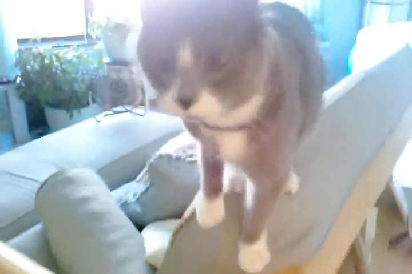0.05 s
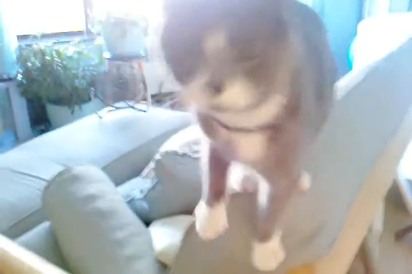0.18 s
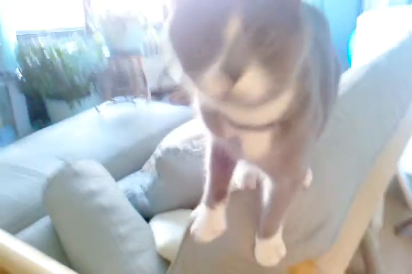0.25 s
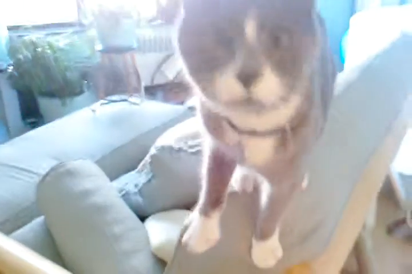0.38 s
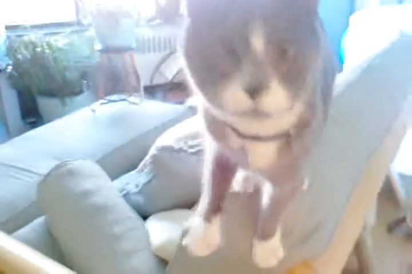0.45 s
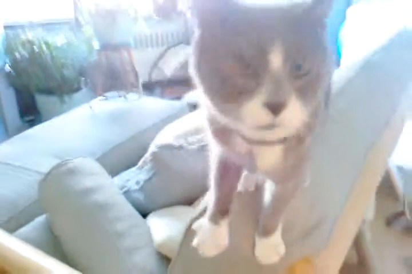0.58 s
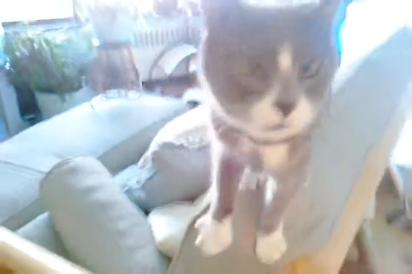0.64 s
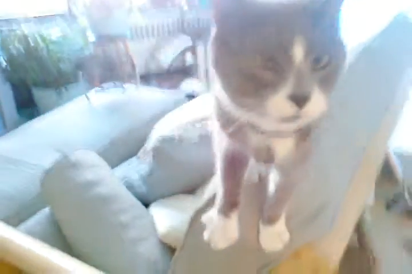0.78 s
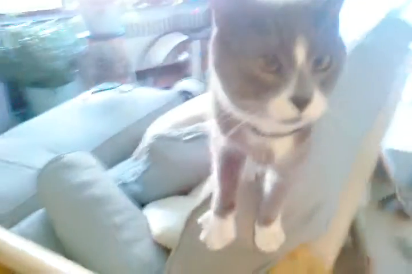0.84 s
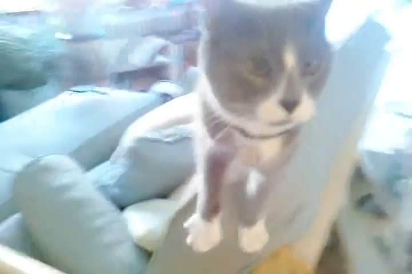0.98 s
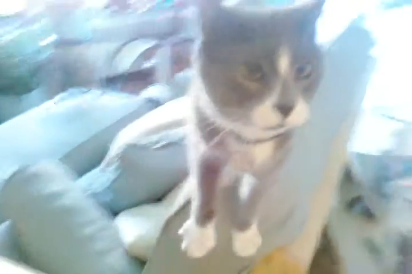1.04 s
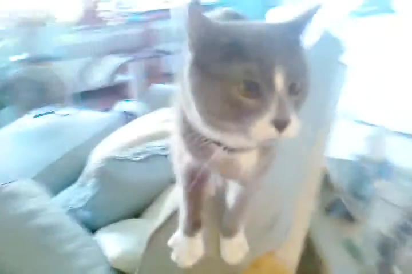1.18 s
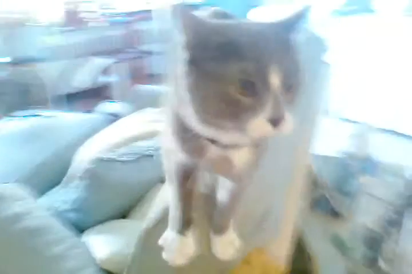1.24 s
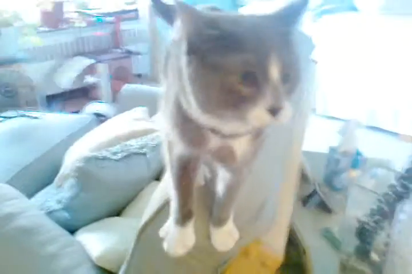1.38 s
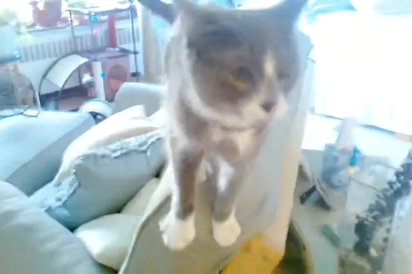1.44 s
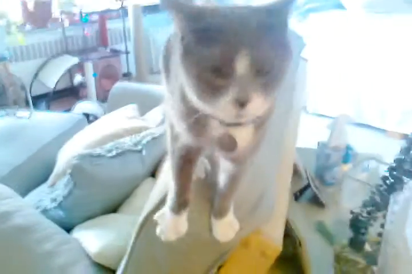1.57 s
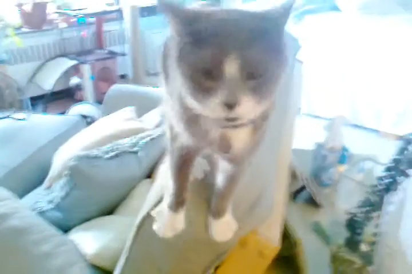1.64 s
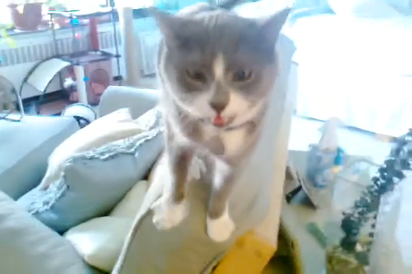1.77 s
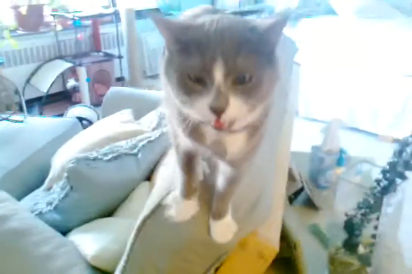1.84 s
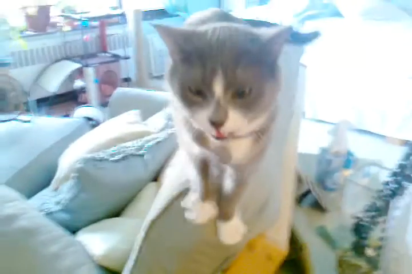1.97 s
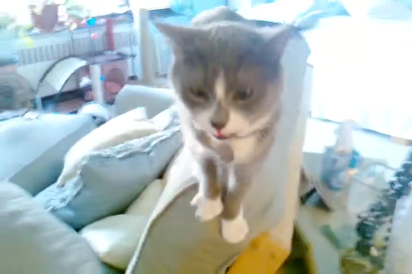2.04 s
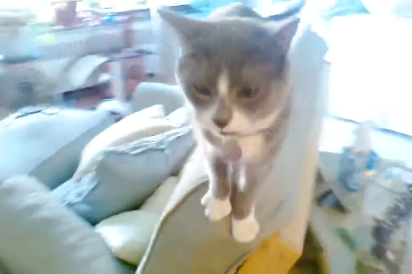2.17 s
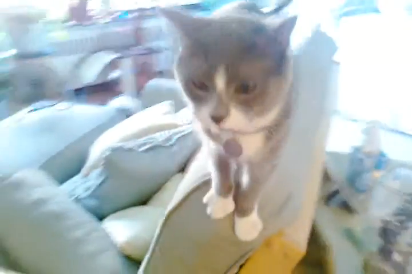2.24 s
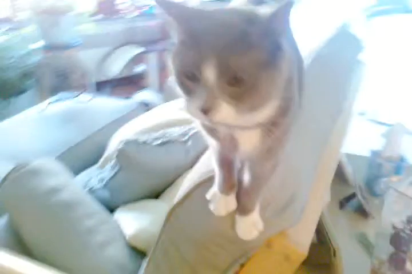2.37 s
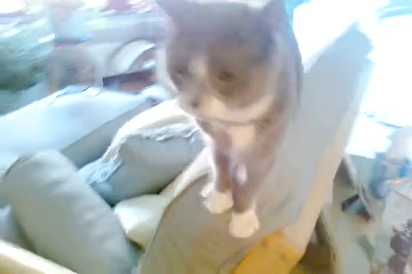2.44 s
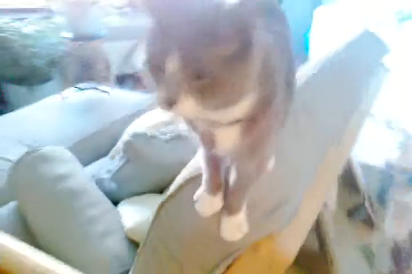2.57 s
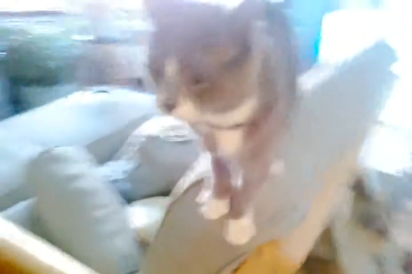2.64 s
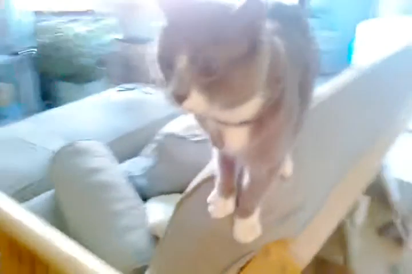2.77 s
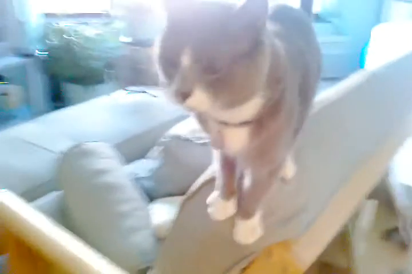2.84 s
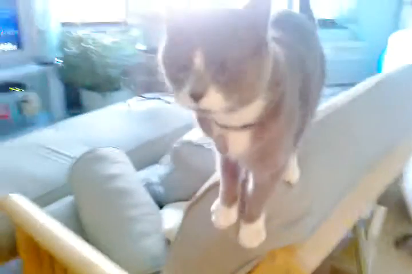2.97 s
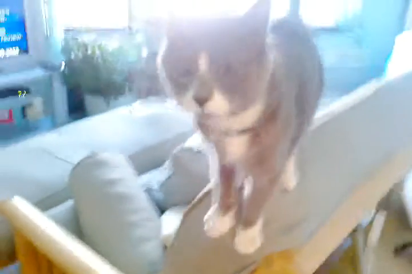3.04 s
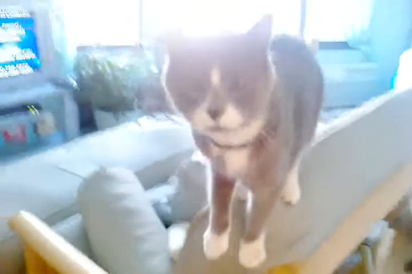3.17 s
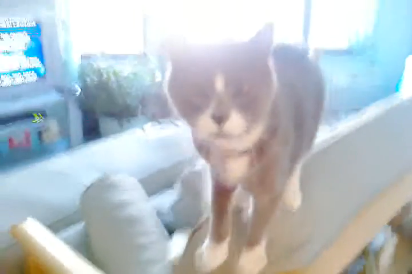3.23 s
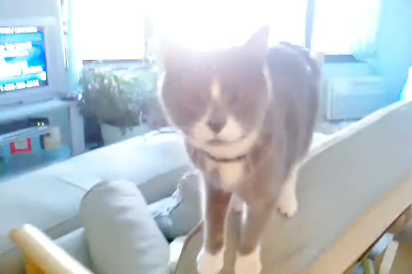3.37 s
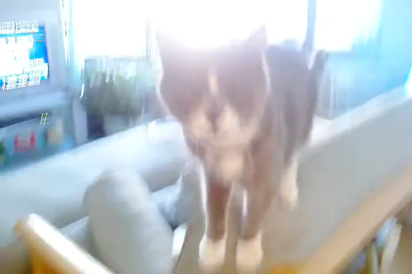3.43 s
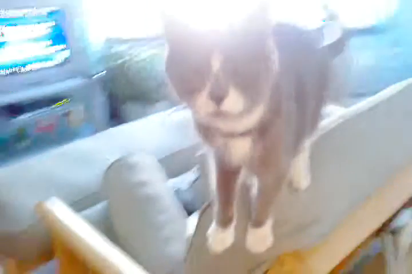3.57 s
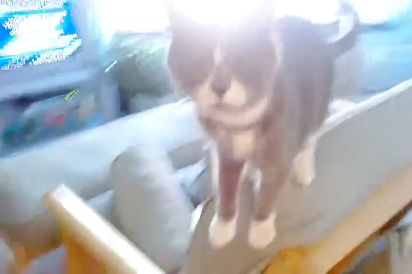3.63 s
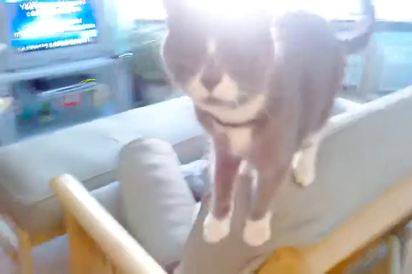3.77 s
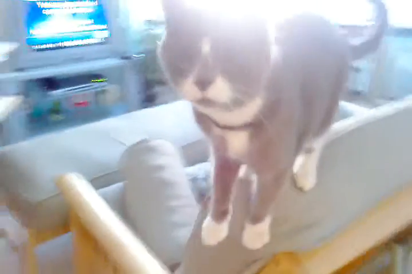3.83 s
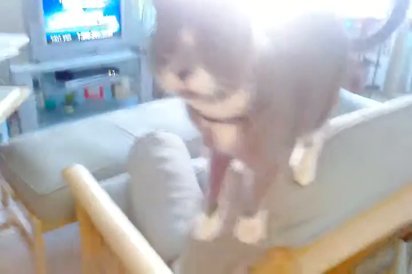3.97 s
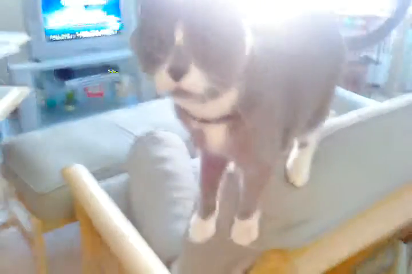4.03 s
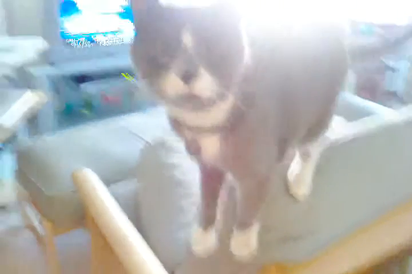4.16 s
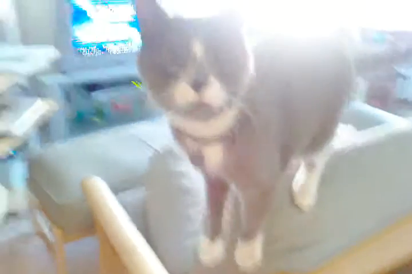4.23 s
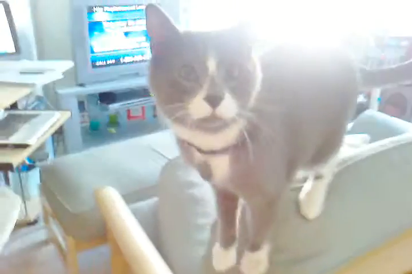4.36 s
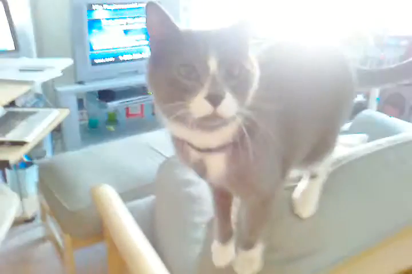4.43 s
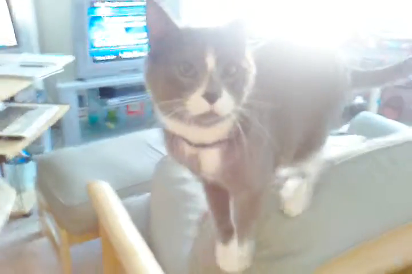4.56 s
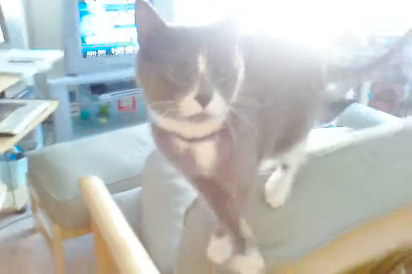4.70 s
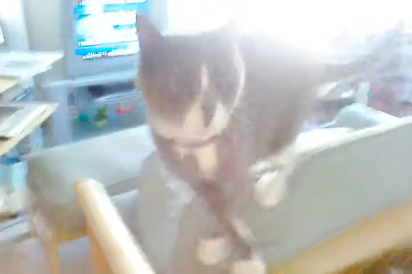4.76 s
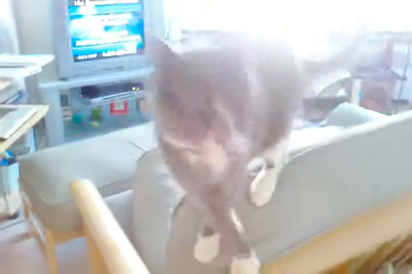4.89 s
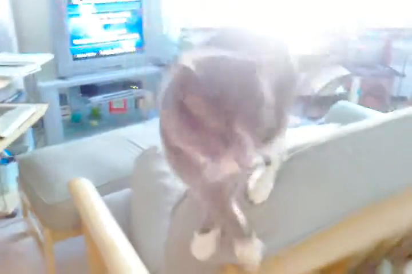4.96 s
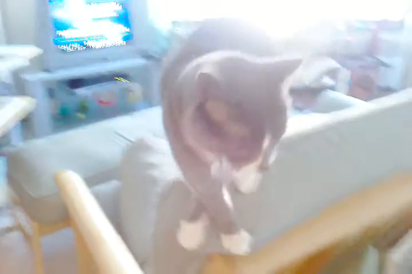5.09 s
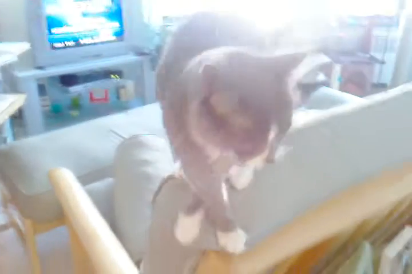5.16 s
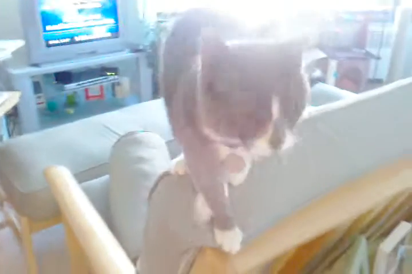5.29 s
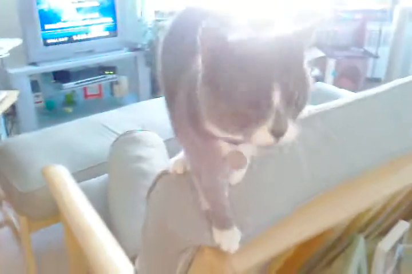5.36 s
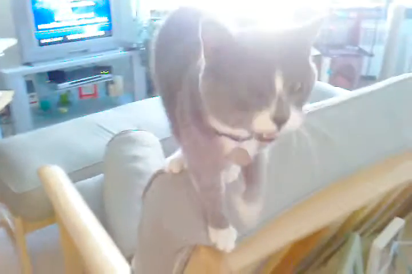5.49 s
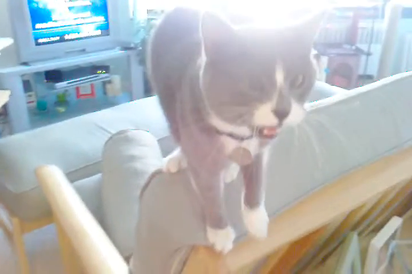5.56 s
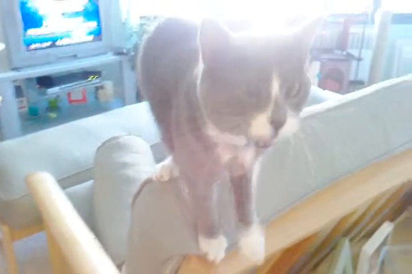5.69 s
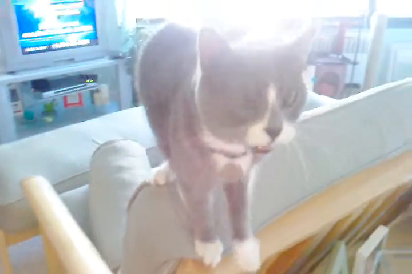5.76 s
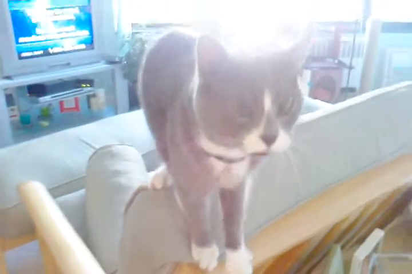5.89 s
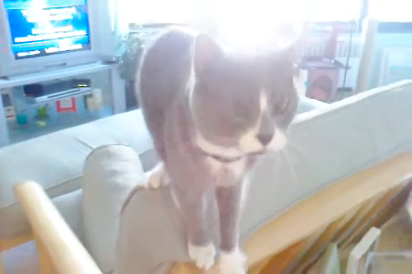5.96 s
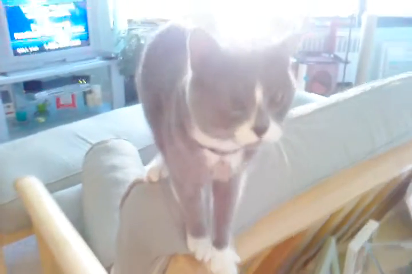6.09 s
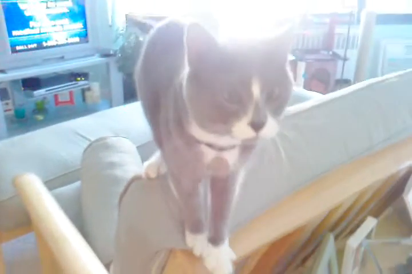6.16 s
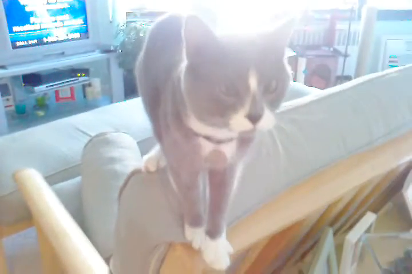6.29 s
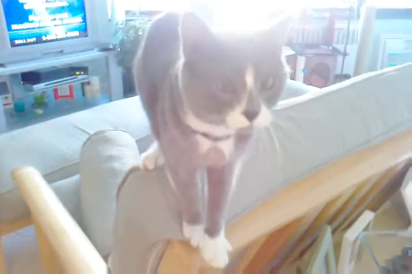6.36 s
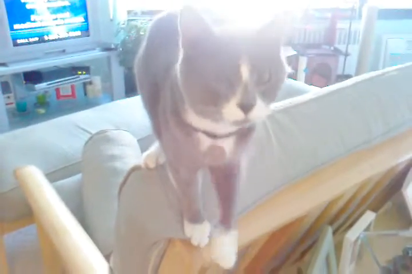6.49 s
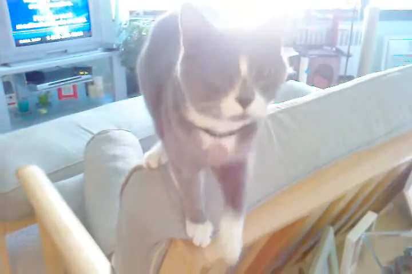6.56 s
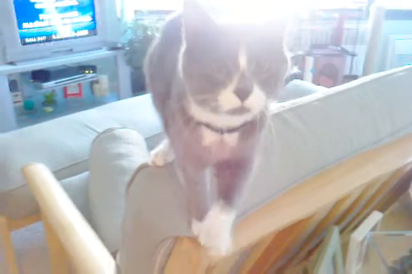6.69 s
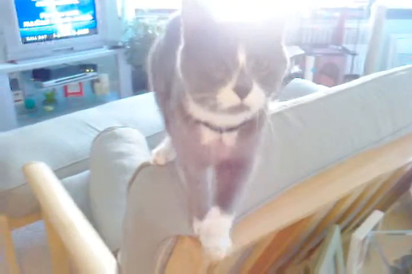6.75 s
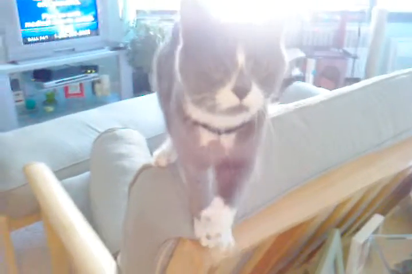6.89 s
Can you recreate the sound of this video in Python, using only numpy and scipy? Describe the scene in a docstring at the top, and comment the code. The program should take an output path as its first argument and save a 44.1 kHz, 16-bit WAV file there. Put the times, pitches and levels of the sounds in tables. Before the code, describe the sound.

In a quiet living room, a fan and soft microphone hiss run throughout. A cat near a hand-held camera gives a short, high meow that rises then falls. Fingers then scuff the plastic case, a very loud dry click snaps on the left, and a weaker release tick follows. Later the cat meows again, rising and staying high.

```python
"""Cat meowing in a living room

On the back of a sofa in a quiet room a cat meows twice at a hand-held camera, while a fan runs.
The voice is a sum of harmonics shaped by mouth and throat resonances, with a short room reverberation.
A finger brushes the case as flickering hiss; between the meows a button beside the left microphone
clicks down and springs back as ringing plastic modes. Air, fan and rustles are filtered noise and a whine.
The camera widens its two close microphones by delayed cross-feed, and ducks after the loud click."""
import sys
import numpy as np
from scipy import signal
from scipy.fft import rfft, irfft
from scipy.io import wavfile
from scipy.ndimage import uniform_filter1d

SR = 44100
rng = np.random.default_rng(int(sys.argv[2]) if len(sys.argv) > 2 else 0)


def to_wav(sig):
    """Store sig (one row per channel, or 1-D mono) as 16-bit WAV at the path in sys.argv[1].

    Samples outside -1..1 are clipped; the rate is SR.
    """
    pcm = np.clip(np.atleast_2d(sig), -1, 1) * 32767
    pcm = np.round(pcm).astype(np.int16)
    wavfile.write(sys.argv[1], SR, pcm.T)  # frames by channels


N = 305172
TIME = np.arange(N) / SR
BINS_HZ = np.maximum(np.arange(N // 2 + 1) * SR / N, 1)

# held pitch of the first meow, an arch, before onset, break and waver: time_s [s], pitch_hz [Hz]
FIRST_PITCH = [(1.588, 623), (1.63, 619), (1.665, 605), (1.73, 675.6), (1.79, 709.7), (1.845, 727.8),
               (1.875, 717.7), (1.92, 724.5), (2, 688), (2.08, 679.7), (2.15, 662), (2.205, 643),
               (2.222, 622), (2.24, 632), (2.253, 560), (2.268, 580)]
# held pitch of the second meow, a rise that is then held: time_s [s], pitch_hz [Hz]
SECOND_PITCH = [(5.334, 545.3), (5.374, 531), (5.43, 612), (5.48, 655), (5.535, 699), (5.62, 714.3),
                (5.74, 701.6), (5.8, 722.4), (5.855, 697), (5.91, 706), (5.945, 738), (5.99, 731.3),
                (6.028, 724)]
# effort, jaw and throat in the first meow: time_s [s], level_db [dB], mouth_opening [0-1],
# throat_ring_db [dB against the mouth resonance]
FIRST_MOUTH = [(1.592, -60, 0, -11), (1.612, -52.5, 0, -22), (1.63, -53, 0.5, -14),
               (1.665, -51.5, 0.6, -23), (1.705, -53, 0.82, -11), (1.745, -46, 0.79, -25),
               (1.794, -40.5, 0.88, -30), (1.85, -38.5, 0.95, -28), (1.915, -40.5, 0.87, -26),
               (1.96, -42.5, 0.88, -34), (1.985, -50, 0.82, -30), (2.03, -53, 0.57, -34),
               (2.08, -56.5, 0.9, -36), (2.134, -57.5, 0.4, -33), (2.194, -52, 0, -22),
               (2.225, -52.5, 0.31, -32), (2.26, -53.5, 0.17, -36)]
# effort, jaw and throat in the second meow: time_s [s], level_db [dB], mouth_opening [0-1],
# throat_ring_db [dB against the mouth resonance]
SECOND_MOUTH = [(5.339, -55, 0.2, -7), (5.352, -44, 0.3, -12), (5.372, -40.5, 0.54, -19),
                (5.386, -43.5, 0.3, -12), (5.402, -43.5, 0.55, -15), (5.432, -43.5, 0.82, -32),
                (5.47, -43, 0.77, -13), (5.505, -44.5, 0.8, -21), (5.56, -40, 0.87, -16),
                (5.62, -38, 0.89, -24), (5.692, -38.5, 0.8, -25), (5.765, -47, 0.85, -27),
                (5.8, -43, 0.58, -21), (5.84, -49.5, 0.62, -32), (5.9, -46.5, 0.65, -23),
                (5.95, -46.5, 0.52, -20), (5.985, -48.5, 0.25, -24), (6.005, -47.5, 0.2, -24),
                (6.016, -52, 0.1, -13), (6.028, -65, 0, -18)]
# opening the mouth raises its resonance and lets out the upper one (dB against the mouth resonance)
MOUTH_CLOSED_HZ, MOUTH_OPEN_HZ, UPPER_OPEN_DB = 1290, 2366, 11
RING_CLOSED_DB = -31   # closing the mouth shuts in the high resonance
THROAT_WIDTH_HZ = 950
# the fundamental grows with pitch and gives way as the voice moves into the mouth resonance
CHEST_DB, CHEST_DB_PER_OCTAVE, CHEST_YIELD = -50.5, 30.5, 0.13
CHEST_CLOSED_DB = 5   # it is also stronger with the mouth closed
USUAL_PITCH_HZ, USUAL_LEVEL_DB = 700, -46
# each meow starts sharp (share of pitch) and rough (0-1), then settles
ONSET_SHARP, ONSET_SETTLE_S = .36, 0.0097
ONSET_ROUGH, ONSET_ROUGH_S = 0.9, 0.012
FRAY_S, BREAK_S = 0.072, 0.013   # last moments, in which it frays and the pitch breaks upward
# between its rough ends it is clean: roughness 0-1, pitch waver and loudness waver as shares
HELD_ROUGH, HELD_WAVER, SHIMMER = 0.04, 0.0016, 0.04


def meow(pitch, mouth, chest_lift_db, onset_chest_db, end_break, end_chest_db, end_rough,
         throat_hz, throat_rise_hz, mouth_top_hz, mouth_width_hz, mouth_widens,
         upper_hz, upper_width_hz, upper_closed_db, ring_hz, ring_db, jitter, rasp):
    """Vocal-fold harmonics pass mouth and throat resonances moved by the jaw, and two that open with it."""
    start, end = pitch[0][0], pitch[-1][0]
    span = (TIME > start - .01) & (TIME < end + .01)
    t = TIME[span]
    age, left = np.maximum(t - start, 0), np.maximum(end - t, 0)
    held_hz, = in_time(pitch, t)
    mouth_db, opening, throat_db = in_time(mouth, t)

    onset = np.exp(-age / ONSET_SETTLE_S)
    broken = np.clip(2 * (1 - left / BREAK_S), 0, 1)
    f0 = held_hz * (1 + ONSET_SHARP * onset + end_break * broken)
    rough_start = ONSET_ROUGH * np.exp(-age / ONSET_ROUGH_S)
    fray = end_rough * np.clip(1 - left / FRAY_S, 0, 1)
    rough = np.clip(HELD_ROUGH + rough_start + fray, 0, 1)

    effort_db = mouth_db - USUAL_LEVEL_DB
    # harder blowing damps the mouth resonance
    width_hz = mouth_width_hz * from_db(mouth_widens * effort_db)
    mouth_hz = MOUTH_CLOSED_HZ + (MOUTH_OPEN_HZ - MOUTH_CLOSED_HZ) * opening
    upper_db = mouth_db + upper_closed_db + (UPPER_OPEN_DB - upper_closed_db) * opening
    # the high resonance rings most when the mouth is wide open
    high_db = mouth_db + ring_db + RING_CLOSED_DB * (1 - opening)
    # the tensed throat rings in a high band that sinks as the jaw closes
    throat_centre_hz = throat_hz + throat_rise_hz * opening
    octaves = np.log2(held_hz / USUAL_PITCH_HZ)
    chest_db = CHEST_DB + chest_lift_db + CHEST_DB_PER_OCTAVE * octaves - CHEST_YIELD * effort_db
    chest_db = chest_db + CHEST_CLOSED_DB * (1 - opening) + onset_chest_db * onset + end_chest_db * broken

    waver = jitter * rough * drift(len(t), 150) + HELD_WAVER * drift(len(t), 30.0)
    f0 = uniform_filter1d(f0, size=200) * (1 + waver)
    phase = 2 * np.pi * np.cumsum(f0) / SR
    voice = 0
    for k in range(1, 11):
        hz = k * f0
        power = (from_db(chest_db) / k ** 2.0) ** 2
        mouth_power = (from_db(mouth_db) * resonance(hz, mouth_hz, width_hz)) ** 2
        power += mouth_power / (1 + (hz / mouth_top_hz) ** 16)
        power += (from_db(upper_db) * resonance(hz, upper_hz, upper_width_hz)) ** 2
        power += (from_db(high_db) * resonance(hz, ring_hz, 850)) ** 2
        power += (from_db(mouth_db + throat_db) * resonance(hz, throat_centre_hz, THROAT_WIDTH_HZ)) ** 2
        power /= 1 + (hz / 5600) ** 24
        # the mouth delays each harmonic differently, which rounds off the pulses
        lag = 2 * np.arctan(2 * (hz - mouth_hz) / width_hz)
        # air turbulence lays a noisy skirt around every harmonic, and each one wavers a little
        skirt = 1 + rasp * rough * drift(len(t), 210) + SHIMMER * drift(len(t), 6.7)
        voice = voice + np.sqrt(2 * power) * skirt * np.sin(k * phase - lag)
    out = np.zeros(N)
    out[span] = voice * np.clip(np.minimum(t - start, end - t) / 0.0097 + .5, 0, 1)
    return out


# lead at the left microphone; it varies with frequency as sound bends round the camera:
# frequency_hz [Hz], first_lead_us [microseconds], second_lead_us [microseconds]
LEFT_LEAD_US = [(715, 10, 93), (1390, 5, 0), (1960, 122, 69), (3400, 10, -28), (4100, 58, 13),
                (4600, 45, 40)]


def at_microphones(voice, meow_index):
    """Sound from one side reaches one microphone a little earlier; a negative lead favours the right."""
    hz, *leads_us = np.transpose(LEFT_LEAD_US)
    lead_us = np.interp(BINS_HZ, hz, leads_us[meow_index])
    half_lag = np.exp(1j * np.pi * BINS_HZ * lead_us / 1e6)
    return irfft(rfft(voice) * np.array([half_lag, half_lag.conj()]), N)


ROOM_T60_S, ROOM_DB = 0.3, -12.5


def living_room(x, unlike_hz):
    """Short decaying reverberation; it differs between the close microphones mainly in the treble."""
    t = TIME[:SR // 2]
    tails = rng.standard_normal((2, len(t))) * from_db(-60 * t / ROOM_T60_S) * (t > .003)
    common, apart = tails / np.sqrt(np.sum(tails ** 2, axis=1, keepdims=True))
    apart = butter(apart, unlike_hz, "high", order=1)
    echoes = signal.fftconvolve([x], [common + apart, common - apart], axes=1)[:, :N]
    return from_db(ROOM_DB) * echoes


# snap and rebounds of the pressed case: start_s [s], strength_db [dB], sharpness_hz [Hz]
PRESS_CONTACTS = [(3.5253, -7.5, 9000), (3.5273, -24, 3000), (3.5314, -28, 1300)]
# ringing modes of the case: frequency_hz [Hz], level_db [dB], t60_s [s]
CASE_MODES = [(417, -23, 0.043), (702, -11.5, 0.059), (1000, -3, 0.021), (1450, 6.5, 0.0061),
              (2030, -10.5, 0.02), (2330, -7.5, 0.01), (3080, -16, 0.0079), (3830, -20, 0.0065),
              (4300, -8, 0.0066), (5600, -8, 0.0074), (7000, -18, 0.011), (8180, 0, 0.0028),
              (9800, -9, 0.0039), (13300, -9, .003)]
# the button springs back and seats: start_s [s], strength_db [dB], sharpness_hz [Hz]
RELEASE_CONTACTS = [(3.8219, -31, 9500), (3.8235, -17, 2100), (3.8258, -40, 2000)]
# ringing modes of the button: frequency_hz [Hz], level_db [dB], t60_s [s]
BUTTON_MODES = [(760, -10.5, 0.029), (1010, -15, 0.011), (1255, -4.5, 0.011), (1940, -7.5, 0.023),
                (2720, -9, 0.012), (3300, -5.5, 0.0075), (4350, -10, 0.0031), (6860, -15, .005),
                (10300, -23, .003), (13000, -18, .003)]
CLICK_LOW_CUT_HZ = 120


def clicks(contacts, modes):
    """Contacts, each with its own strength and sharpness, ring the plastic as decaying modes."""
    force = np.zeros(N)
    for start_s, strength_db, sharp_hz in contacts:
        blow = np.zeros(N) + 1e-18
        blow[round(start_s * SR)] = from_db(strength_db)
        force += butter(blow, sharp_hz, "low", order=1)
    out = 0
    for hz, db, t60_s in modes:
        r = from_db(-60 / (t60_s * SR))   # decay per sample
        w = 2 * np.pi * hz / SR
        ring = signal.lfilter([1, -r * np.cos(w)], [1, -2 * r * np.cos(w), r * r], force)
        out = out + from_db(db) * ring
    return butter(butter(out, 200, "high", order=1), CLICK_LOW_CUT_HZ, "high", order=1)


# finger on the case: start_s [s], length_s [s], rise [share of length], hold [share of length],
# level_db [dB], extra_treble_db [dB], extra_body_db [dB]
BRUSHES = [(0.0, 0.072, 0.018, 0.03, -47.5, 11, -3), (3.197, 0.049, 0.08, 0.3, -33, 1.5, 0.5),
           (3.231, 0.036, 0.3, 0.18, -46.5, 7.5, -3), (3.266, 0.13, 0.14, 0.21, -41.5, 1.5, -14),
           (3.379, 0.049, 0.6, 0.38, -42, -2, -5), (3.452, 0.093, 0.48, 0.1, -53.5, 1, -6)]
# colour of skin on plastic: frequency_hz [Hz], level_db [dB]
BRUSH_COLOUR = [(100, -20), (400, 10.5), (650, 3), (1000, 10.5), (1200, 3), (1430, 7), (2000, -1),
                (2600, 1), (3400, -0.5), (4000, -1.5), (4650, -2.5), (5800, 3.5), (7000, -2), (8600, 0.5),
                (9500, -3.5), (12200, -5), (13500, -9)]


def brushes(grain_db, treble_hz, body_hz, catches_per_s, catch_db):
    """Skin slides over plastic: short swells of hiss with tiny catches, different at each microphone."""
    colour, = in_frequency(BRUSH_COLOUR)
    catches = rng.standard_normal((2, N)) * (rng.random((2, N)) < catches_per_s / SR)
    friction = rng.standard_normal((2, N)) + from_db(catch_db) * rms_one(catches)
    coloured = irfft(rfft(friction) * colour, N)
    hiss = rms_one(flicker(coloured)) / np.sqrt(2)
    treble = irfft(rfft(hiss) / (1 + (treble_hz / BINS_HZ) ** 2), N)
    body = irfft(rfft(hiss) / (1 + (BINS_HZ / body_hz) ** 2), N)
    out = 0
    for start_s, length_s, rise, hold, db, treble_db, body_db in BRUSHES:
        corners = np.clip([0, rise, rise + hold, 1], 0, 1)
        swell = np.interp(TIME, start_s + length_s * corners, [0, 1, 1, 0])
        tone = hiss + (from_db(treble_db) - 1) * treble + (from_db(body_db) - 1) * body
        out = out + from_db(db) * swell * tone
    return out * from_db(grain_db * drift(N, 300))


# borders of the separately flickering bands of the brushing hiss: frequency_hz [Hz]
BRUSH_BANDS_HZ = [0, 1200, 2400, 4200, 6500, 9000, 11500, 22050]
BRUSH_FLICKER_DB, BRUSH_FLICKER_HZ = 2.2, 110


def flicker(x):
    """The skin catches unevenly, so each band swells and sinks quickly on its own."""
    spectrum = rfft(x)
    out = 0
    for low_hz, high_hz in zip(BRUSH_BANDS_HZ, BRUSH_BANDS_HZ[1:]):
        band = irfft(spectrum * ((BINS_HZ >= low_hz) & (BINS_HZ < high_hz)), N)
        out = out + band * from_db(BRUSH_FLICKER_DB * drift(N, BRUSH_FLICKER_HZ))
    return out


# room air and microphone hiss, before room modes and trims: frequency_hz [Hz],
# common_db [dB per Hz, shared by the microphones], apart_db [dB per Hz, their difference]
AIR = [(40, -79, -99.7), (97, -88, -87.5), (118, -74.5, -90), (275, -76, -90), (576, -90, -98),
       (800, -84.5, -92), (988, -90.5, -95), (1930, -97.5, -96), (2690, -99.5, -101), (3530, -101, -100.5),
       (3960, -101.5, -102), (4850, -107, -107), (7800, -103, -106), (9000, -105, -106.5),
       (9400, -106.5, -110), (13000, -110, -113), (14400, -107.5, -111)]
# fan-noise pitches the room favours or cancels: frequency_hz [Hz], width_hz [Hz], level_db [dB]
ROOM_MODES = [(159, 23, -4.5), (176, 38, 3.5), (354, 45, -0.5), (409, 9.4, -0.5), (500, 12, 5.5),
              (580, 47, -0.5), (666, 26, 4), (735, 30, -4), (838, 30, 1), (1090, 43, -2.5), (1184, 50, 1.5)]
# soft rustles, as changes at their peak: peak_s [s], length_s [s], low_db [dB], hiss_db [dB]
RUSTLES = [(0.59, 0.42, 1.5, 8), (2.24, 0.42, 4, 5), (4.117, 0.24, -1.5, 3.5), (5.23, 0.35, 1, -0.5),
           (6.148, 0.89, 4, 3.5)]
REST_LOW_DB, REST_HISS_DB = 1.33, -3   # trims between rustles
# faint whine of the fan: time_s [s], level_db [dB]
WHINE = [(0, -64), (.8, -63), (2.6, -69), (4.2, -71), (6.9, -70)]
WHINE_HZ, WHINE_WANDER_HZ, WHINE_FLUTTER_DB = 914, 5.77, 3.5   # wavers a little in pitch and level
# hum of the fan motor, at the left microphone: frequency_hz [Hz], level_db [dB]
HUM = [(133.4, -60), (267.5, -66.5), (409, -67)]
HUM_WIDTH_HZ, HUM_RIGHT_DB = 9.8, -2   # slightly unsteady, and weaker on the right


def background(split_hz, self_noise_db):
    """Air, fan and microphone hiss as shaped noise; rustles briefly shift its lows and hiss."""
    room_db = sum(db * resonance(BINS_HZ, hz, width_hz) for hz, width_hz, db in ROOM_MODES)
    common, apart = [noise(gains * from_db(room_db)) for gains in in_frequency(AIR)]
    air = np.array([common + apart, common - apart]) * from_db(self_noise_db)
    low_db, hiss_db = REST_LOW_DB, REST_HISS_DB
    for peak_s, length_s, low_change_db, hiss_change_db in RUSTLES:
        swell = np.clip(1 - 2 * np.abs(TIME - peak_s) / length_s, 0, 1)
        low_db = low_db + low_change_db * swell
        hiss_db = hiss_db + hiss_change_db * swell
    low = irfft(rfft(air) / (1 + (BINS_HZ / split_hz) ** 2), N)
    rustling_air = low * from_db(low_db) + (air - low) * from_db(hiss_db)

    turn = 2 * np.pi * np.cumsum(WHINE_HZ + WHINE_WANDER_HZ * drift(N, 11.1)) / SR
    flutter = from_db(WHINE_FLUTTER_DB * drift(N, 16))
    whine = from_db(in_time(WHINE, TIME)[0]) * rms_one(np.sin(turn) * flutter)
    hum = sum(from_db(db) * rms_one(noise(resonance(BINS_HZ, hz, HUM_WIDTH_HZ))) for hz, db in HUM)
    return rustling_air + whine + hum * from_db([[0], [HUM_RIGHT_DB]])


def from_db(db):
    """Decibels to gain."""
    return 10 ** (np.asarray(db) / 20)


def rms_one(x):
    """Scale to unit power."""
    return x / np.sqrt(np.mean(x ** 2) + 1e-20)


def in_time(rows, t):
    """Each column of a curve at the times t."""
    s, *columns = np.transpose(rows)
    return [np.interp(t, s, c) for c in columns]


def in_frequency(rows):
    """Each dB column of a spectrum as gains on the frequency grid."""
    hz, *columns = np.transpose(rows)
    return [from_db(np.interp(np.log(BINS_HZ), np.log(hz), c)) for c in columns]


def noise(gains):
    """Noise whose amplitude per root Hz follows the gains."""
    return irfft(rfft(rng.standard_normal(N)) * gains, N) * np.sqrt(SR / 2)


def butter(x, hz, kind, order):
    """Causal low- or high-pass."""
    return signal.sosfilt(signal.butter(order, min(hz, .45 * SR), kind, fs=SR, output="sos"), x)


def drift(size, hz):
    """Slow chance with spread 1: noise low-passed at hz."""
    return rms_one(butter(rng.standard_normal(size + SR), hz, "low", order=2)[SR:])


def resonance(hz, centre_hz, width_hz):
    """Gain of a resonance, 1 on top."""
    return 1 / (1 + (2 * (hz - centre_hz) / width_hz) ** 2)


def scene():
    """Cat, its room, button, finger and background at the left and right microphones."""
    first = meow(
        FIRST_PITCH, FIRST_MOUTH, chest_lift_db=0.2, onset_chest_db=-2,
        end_break=0.024, end_chest_db=-7, end_rough=0.7, throat_hz=3500, throat_rise_hz=500,
        mouth_top_hz=3180, mouth_width_hz=950, mouth_widens=0.01,
        upper_hz=3316, upper_width_hz=285, upper_closed_db=-25.5,
        ring_hz=4280, ring_db=-7.0, jitter=0.031, rasp=0.62)
    second = meow(
        SECOND_PITCH, SECOND_MOUTH, chest_lift_db=-1.5, onset_chest_db=17.5,
        end_break=0.045, end_chest_db=4, end_rough=0.1, throat_hz=4060, throat_rise_hz=850,
        mouth_top_hz=2380, mouth_width_hz=970, mouth_widens=0.039,
        upper_hz=3335, upper_width_hz=240, upper_closed_db=-48,
        ring_hz=4780, ring_db=-14, jitter=0.035, rasp=0.7)
    cat = at_microphones(first, 0) + at_microphones(second, 1)
    cat = cat + living_room(first + second, unlike_hz=1990)
    button = clicks(PRESS_CONTACTS, CASE_MODES) + clicks(RELEASE_CONTACTS, BUTTON_MODES)
    button = button * from_db([[0], [-28]])   # almost all in the left microphone
    finger = brushes(grain_db=0.1, treble_hz=6300, body_hz=1800, catches_per_s=2300, catch_db=-4.5)
    return cat + button + finger + background(split_hz=1490, self_noise_db=-1.0)


def gain_control(x, threshold_db, depth_db, release_db_per_s, attack_hz):
    """A loud peak turns the gain down quickly; it creeps back up."""
    peak_db = 20 * np.log10(np.abs(x).max(axis=0) + 1e-9)
    excess = np.clip(peak_db - threshold_db, 0, depth_db)
    # each excess is held and falls at the release rate until a larger one comes
    held = np.maximum.accumulate(excess + release_db_per_s * TIME) - release_db_per_s * TIME
    return x * from_db(-butter(held, attack_hz, "low", order=1))


# steady treble hiss, separate in each channel, before bass cut, gain control and treble cut:
# frequency_hz [Hz], level_db [dB per Hz]
TREBLE_HISS = [(3000, -124), (4400, -110), (7300, -105), (10000, -107.5), (13500, -111.5)]
CROSSFEED_SAMPLES, CUTOFF_HZ = 15, 14000


def record(dry):
    """Subtract the other channel delayed, add hiss, then cut bass, control gain, clip and cut treble."""
    share = from_db(np.interp(BINS_HZ, [3500, 6000], [0, -3]))   # less cross-feed in the treble
    delay = np.exp(-2j * np.pi * BINS_HZ * CROSSFEED_SAMPLES / SR)
    delayed = irfft(rfft(dry[::-1]) * share * delay, N)
    hiss = np.array([noise(in_frequency(TREBLE_HISS)[0]) for channel in dry])
    wide = butter(dry - delayed + hiss, 82, "high", order=3)
    levelled = gain_control(wide, threshold_db=-11, depth_db=4.5, release_db_per_s=7.0, attack_hz=40)
    overloaded = np.clip(levelled, -1, 1)
    return signal.sosfilt(signal.ellip(10, .1, 70, CUTOFF_HZ, fs=SR, output="sos"), overloaded)


dry = scene()
out = record(dry)
to_wav(out)
```